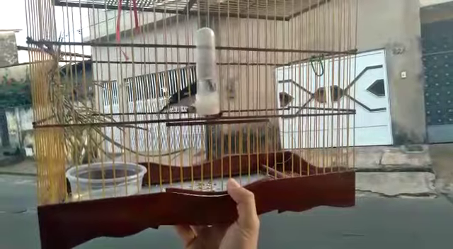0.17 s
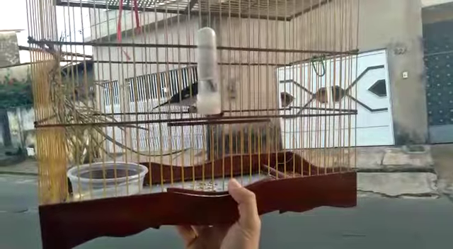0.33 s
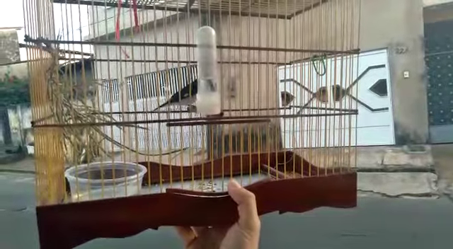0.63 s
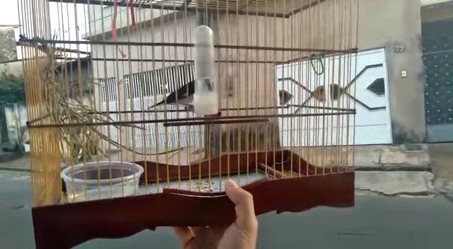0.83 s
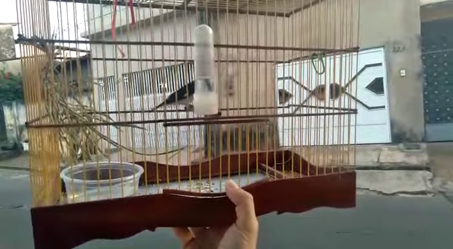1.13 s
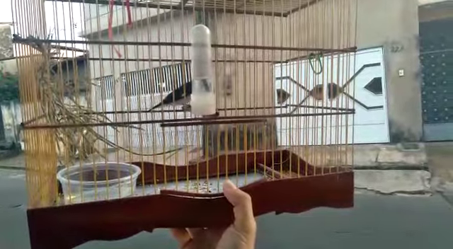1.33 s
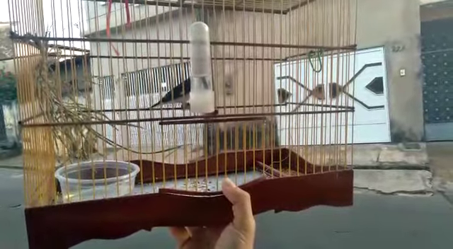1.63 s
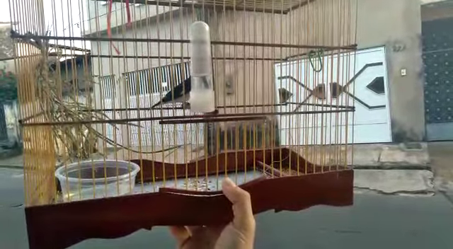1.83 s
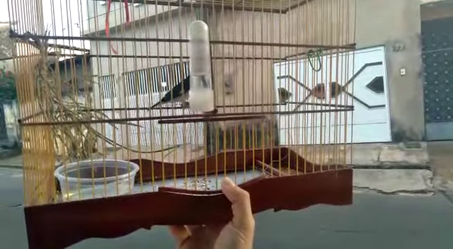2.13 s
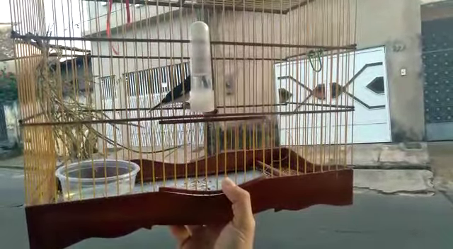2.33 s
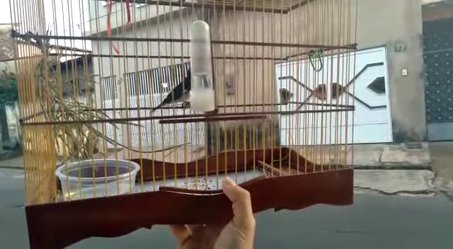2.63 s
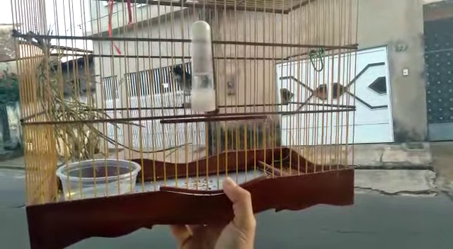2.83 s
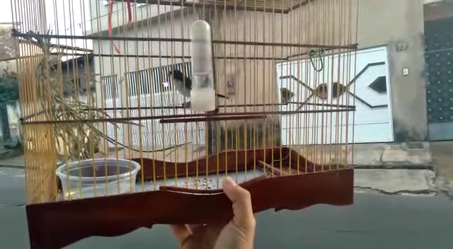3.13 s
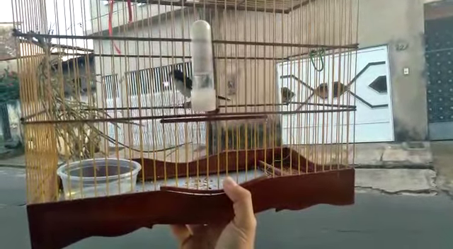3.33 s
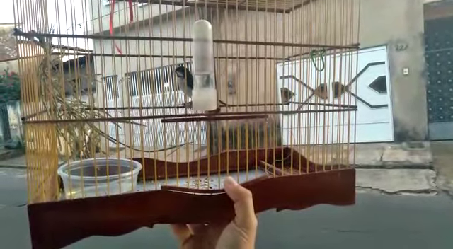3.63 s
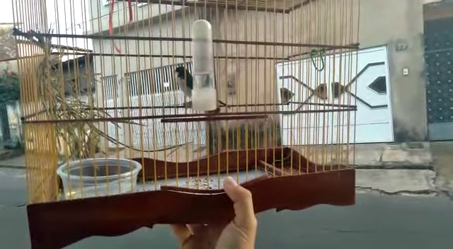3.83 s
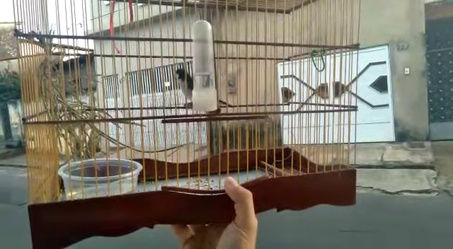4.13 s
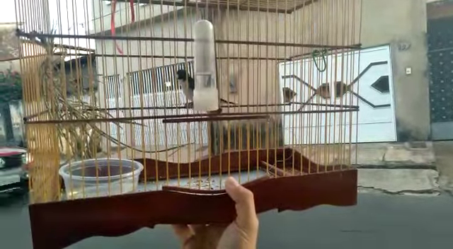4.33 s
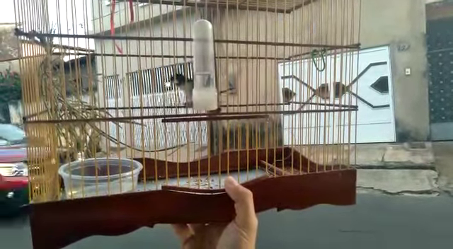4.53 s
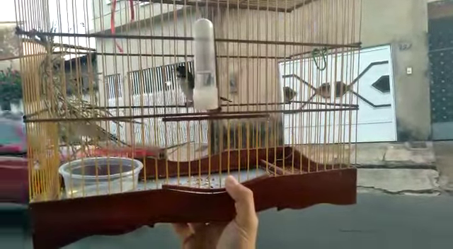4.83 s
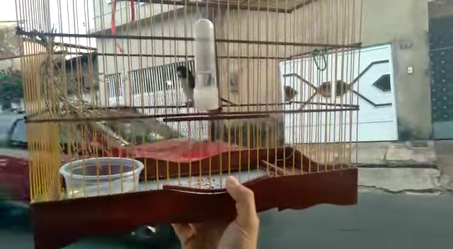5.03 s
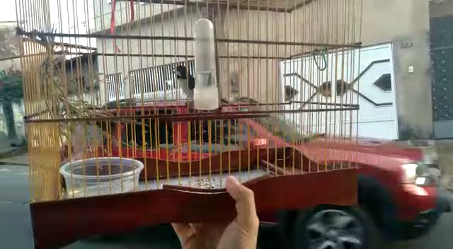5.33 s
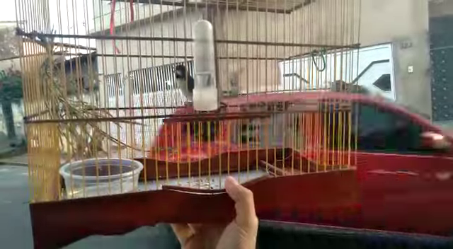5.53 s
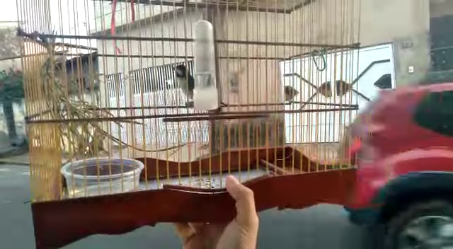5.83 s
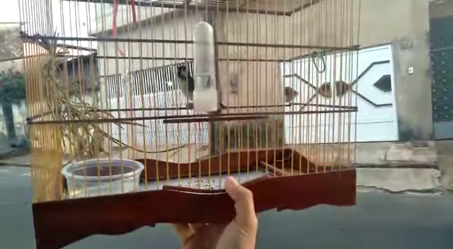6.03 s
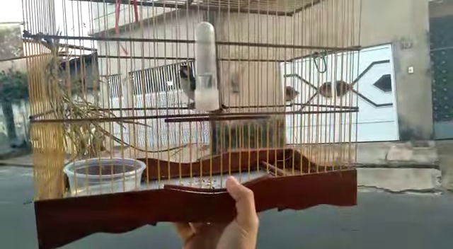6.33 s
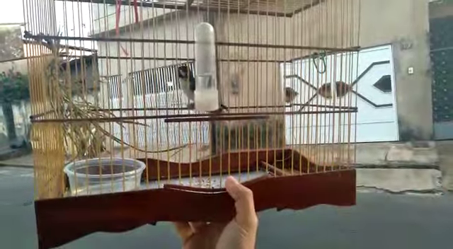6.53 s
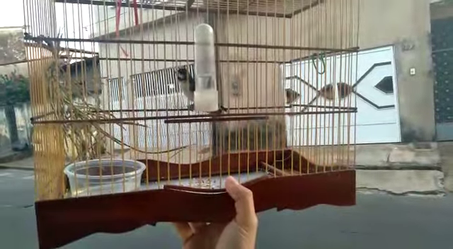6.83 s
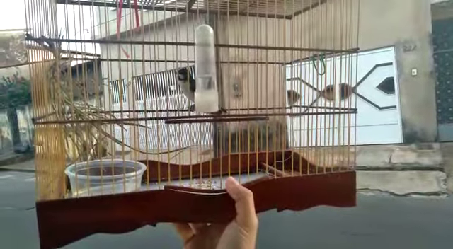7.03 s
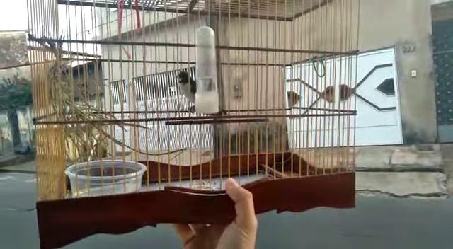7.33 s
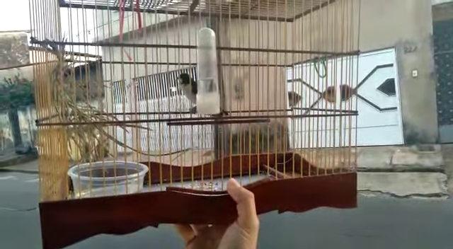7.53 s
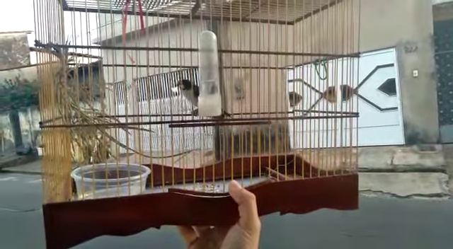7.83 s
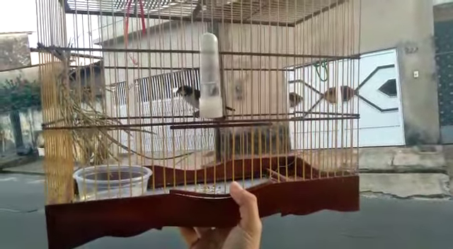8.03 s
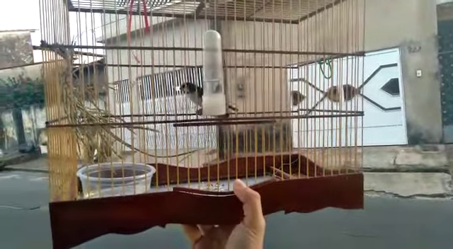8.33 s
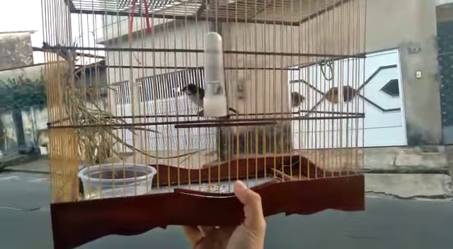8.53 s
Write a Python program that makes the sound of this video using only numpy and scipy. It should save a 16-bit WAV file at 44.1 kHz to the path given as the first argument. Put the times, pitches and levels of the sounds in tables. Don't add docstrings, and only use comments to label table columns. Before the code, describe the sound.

Distant birds call in echo, a car rolls by, then a small bird held close whistles and trills piercingly while its cage knocks.

```python
import sys
import numpy as np
from scipy import signal
from scipy.io import wavfile
from scipy.ndimage import uniform_filter1d, minimum_filter1d

SR = 44100
rng = np.random.default_rng(int(sys.argv[2]) if len(sys.argv) > 2 else 0)


def transcribe(u):
    v = np.clip(np.atleast_2d(u).T, -1, 1)
    q = np.round(v * 32767).astype(np.int16)
    wavfile.write(sys.argv[1], SR, q)


def field_ratio(decibels):
    return 10 ** (np.asarray(decibels, dtype=float) / 20)


N = 382347

# pitch in Hz, level in dB per Hz.
STREET_HUM = [(25, -35.5), (43, -2), (243, -6.5), (435, -13.5), (707, -43), (947, -17), (1510, -24),
              (2600, -66)]
# pitch in Hz, level in dB per Hz.
STREET_HISS = [(2600, -57), (3100, -55), (3710, 12), (4580, -38), (5790, -13), (7890, -5), (15800, -42)]
# pitch in Hz, level in dB per Hz.
TYRE_ROAR = [(25, -22.5), (70, -7.5), (130, -9), (307, -23), (418, -9), (629, -24), (1170, -13.5),
             (2600, -25.5)]
# pitch in Hz, level in dB per Hz.
TYRE_SIZZLE = [(1530, -45), (2600, 3.5), (2910, -12), (3790, -3), (5600, -8), (8100, 2), (10400, -11.5),
               (15800, -13.5)]
# pitch in Hz, level in dB per Hz.
TYRE_WAKE = [(25, -13.5), (82, -1), (420, -9), (1250, -19), (2140, -22.5), (3680, -37.5), (8260, -28.5),
             (10500, -61)]
# time in seconds, level in dB.
CAR_PASS = [(1.0, -46.5), (1.93, -44), (2.54, -38.5), (3.4, -34.5), (4.8, -30.5), (5.14, -34), (5.6, -38.5),
            (6.5, -45), (7.2, -46), (8.2, -57)]
# time in seconds, level in dB.
WAKE_LEVEL = [(2.0, -84), (4.8, -34), (5.87, -32.5), (6.4, -36), (6.85, -35.5), (7.2, -30.5), (7.9, -34),
              (8.33, -33), (8.67, -32.5)]
# time in seconds, firing rate in Hz, level in dB.
CAR_ENGINE = [(2.6, 54.8, -40), (2.77, 55.5, -40), (3.43, 69.53, -33.5), (3.98, 70.5, -31),
              (4.25, 68.43, -30.5), (4.59, 64.14, -31), (4.83, 58.65, -34), (4.96, 58.4, -29.5),
              (5.3, 49.2, -35.5)]
# multiple, level in dB.
ENGINE_MULTIPLES = [(1, 0), (2, -9), (3, -14), (4, -15), (5, -14), (6, -14), (7, -17), (8, -18), (9, -25)]
# time in seconds, pitch in Hz, level in dB.
FAR_ENGINE = [(0.0, 81.8, -50), (0.27, 88, -47), (1.5, 80, -47.5), (2.27, 81, -34), (2.6, 79.7, -42),
              (3.2, 82.5, -47), (5.1, 89, -63), (5.27, 96, -32.5), (6.16, 79.6, -35), (6.96, 75.7, -41),
              (7.38, 89.8, -37), (7.56, 69.8, -29), (7.7, 77.7, -43), (8.3, 66.8, -41.5),
              (8.67, 72.8, -34.5)]
# time in seconds, level in dB.
FAR_CHORUS = [(0.0, -24.5), (0.8, -36.5), (1.46, -32.5), (1.8, -24.5), (2.71, -30.5), (3.0, -40),
              (3.98, -27.5), (4.33, -27), (4.8, -43)]
# start in seconds, length in seconds, from Hz, to Hz, peak in dB.
STEADY_PEEP = [
    (0.0, 0.2, 2290, 2210, -46),
]
# start in seconds, length in seconds, from Hz, to Hz, peak in dB.
FALLING_CALLS = [
    (0.033, 0.0072, 6330, 5200, -60),
    (0.153, 0.046, 9270, 7200, -46.5),
    (.972, 0.19, 6810, 3346, -47),
    (1.141, 0.019, 9230, 7260, -44),
    (1.255, 0.078, 6710, 4460, -48),
    (2.11, 0.032, 8740, 7880, -48),
    (2.81, 0.041, 8840, 8200, -50),
    (7.61, 0.038, 9300, 7110, -47.5),
    (8.272, 0.058, 8700, 8330, -60),
    (8.493, 0.049, 9440, 6900, -46.5),
]
# start in seconds, peak in dB, pitch in Hz, seconds to fade by 60 dB.
WIRE_TICKS = [
    (0.4469, -31, 6100, 0.14),
    (0.4475, -31, 8000, 0.1),
    (2.3361, -31, 7700, 0.03),
    (5.322, -29, 8000, .02),
    (7.5158, -39, 6400, 0.08),
    (8.652, -42, 8000, .04),
]
# start in seconds, peak in dB, pitch in Hz, seconds to fade by 60 dB.
CAGE_KNOCKS = [(2.4256, -10, 1850, 0.029), (2.5044, -16, 1590, 0.04), (7.0893, -19, 802, 0.045),
               (7.165, -18, 1220, 0.024), (7.3949, -8, 1540, 0.024), (7.649, -20, 1020, 0.068),
               (7.728, -33, 715, 0.028), (7.754, -9, 1530, 0.0066), (8.0025, -18, 703, 0.03),
               (8.134, -22, 610, 0.04), (8.3823, -15.5, 1250, 0.034), (8.441, -18.5, 883, 0.12),
               (8.51, -20, 1090, .04), (8.652, -20.5, 1060, 0.04)]
# start in seconds, peak in dB, pitch in Hz, seconds to fade by 60 dB.
CAGE_THUDS = [(2.42, -36, 217, 0.14), (2.498, -29.5, 191, 0.26), (5.616, -17.5, 408, 0.055),
              (6.005, -20, 255.2, 0.22), (7.088, -18.5, 267, 0.034), (7.444, -20.5, 300, 0.043),
              (7.499, -20, 380, 0.02), (7.65, -31, 272, 0.04), (7.752, -49, 299, 0.047),
              (8.0, -30.5, 247, 0.079), (8.437, -25.5, 247, 0.1)]
# time in seconds, pitch in Hz, level in dB.
DISTANT_WHISTLES = [
    [(1.33, 3890, -45), (1.344, 3920, -29), (1.366, 3780, -23), (1.396, 3820, -25.5), (1.412, 3810, -42),
     (1.438, 3780, -26), (1.45, 3786, -65)],
    [(1.512, 4060, -46), (1.518, 3971, -37), (1.544, 3820, -23), (1.592, 3640, -29), (1.61, 3770, -24),
     (1.632, 3690, -38), (1.662, 3720, -32), (1.672, 3720, -44)],
]
# time in seconds, pitch in Hz, level in dB.
DISTANT_CALLS = [
    [(3.097, 3602, -43), (3.103, 3720, -40), (3.127, 3800, -32), (3.159, 4040, -40), (3.175, 4160, -30.5),
     (3.255, 4090, -46)],
    [(3.315, 5200, -42), (3.335, 5000, -29), (3.365, 4600, -38), (3.39, 4350, -36), (3.41, 4000, -22),
     (3.425, 3650, -29), (3.44, 3250, -42)],
]
# start in seconds, length in seconds, from Hz, to Hz, peak in dB.
FAR_CLEAR_NOTES = [
    (0.93, 0.13, 3850, 3935, -39.5),
    (3.165, 0.03, 6230, 6200, -38),
    (3.215, 0.02, 6200, 6200, -42),
    (3.27, .03, 6200, 6200, -39),
    (3.76, .05, 3750, 3800, -36),
    (3.86, .05, 3800, 3700, -36),
    (4.07, .05, 3750, 3700, -37),
    (4.17, .06, 3750, 3650, -36),
]
# start in seconds, length in seconds, from Hz, to Hz, peak in dB.
FAR_THROB = [
    (2.665, 0.219, 3915, 3820, -25.5),
]
# start in seconds, peak in dB, pitch in Hz.
FAR_TRILL_NOTES = [(1.864, -19, 3870), (2.053, -20, 3890), (2.233, -20, 4040), (2.295, -23, 4150),
                   (2.3834, -17, 3820), (2.417, -22, 3840), (2.478, -20.5, 3900), (2.5438, -17.5, 3920),
                   (2.672, -21.5, 3874), (2.852, -26, 3800)]
# main arch in seconds, stretch factor, level in dB.
DISTANT_WARBLES = [
    (1.79, 1.03, -16.5),
    (1.881, 0.96, -17),
    (1.976, 0.84, -16),
    (2.067, 1.03, -18),
    (2.159, 1.03, -24.5),
]
# from Hz, to Hz, level in dB.
CARRYING_BANDS = [(3700, 4000, 3), (3270, 3430, -4), (4100, 4900, -10)]
# time in seconds, pitch in Hz, level in dB.
OPENING_PIP = [(4.968, 4455, -38.5), (4.984, 4287, -18), (4.996, 4314, -13), (5.01, 4320, -17),
               (5.019, 4370, -25)]
# time in seconds, pitch in Hz, level in dB.
NEAR_WHISTLES = [
    [(5.153, 4030, -36.5), (5.173, 3940, -16), (5.193, 3883, -13.5), (5.211, 3843, -13),
     (5.219, 3840, -20.5), (5.229, 3714, -14.5), (5.256, 3760, -18.5)],
    [(5.343, 4080, -29), (5.359, 4008, -10), (5.381, 3962, -6.5), (5.405, 3848, -9.5), (5.423, 3860, -7),
     (5.433, 3820, -19), (5.441, 3660, -9.5), (5.449, 3766, -26)],
    [(5.529, 3977, -24), (5.549, 4025, -7), (5.575, 3954, -5.5), (5.597, 3850, -11.5), (5.609, 3840, -5),
     (5.628, 3795, -32.5)],
    [(5.714, 3900, -25), (5.73, 4047, -6.5), (5.752, 3923, -5.5), (5.782, 3835, -10.5), (5.794, 3790, -10),
     (5.806, 3990, -26)],
]
# multiple, level in dB.
WHISTLE_OVERTONES = [(2, -26), (3, -26), (4, -33)]
# start in seconds, length in seconds, from Hz, to Hz, peak in dB.
WHISTLE_FLICKS = [
    (5.15, 0.0085, 3270, 4000, -29),
    (5.342, 0.012, 2800, 3820, -31),
    (5.528, 0.008, 2900, 3906, -24),
    (5.628, 0.01, 4000, 3480, -10),
    (5.714, 0.009, 2835, 3800, -29.5),
    (5.816, 0.007, 4360, 3050, -18),
]
# time in ms, crest in Hz, flank in dB, dip at crest in dB, dip after it in dB.
BUZZ_ARCHES = [(1, 3550, -20, 0, 0), (5, 3400, -7, -1, -3), (13.5, 3350, -9, -1, -14),
               (22.5, 3800, -12, -9, -1), (33.5, 3900, -5, -9, -10), (40.5, 3800, -5, -8, 1),
               (46.5, 3800, -6, -10, -1), (53, 3950, -10, -9, -9), (60.5, 3200, -11, 0, 0),
               (66, 2200, -28, 0, 0)]
BUZZ_LOWS = [3000, 2600, 3000, 2900, 3350, 3100, 2700]
# time in ms, crest in Hz, flank in dB, dip at crest in dB, dip after it in dB.
WARBLE_ARCHES = [(-14, 4500, -20, 0, 0), (-13, 4800, -13, -1, -12), (-10.6, 4500, -8, -1, -9),
                 (-8.5, 3900, -19, 0, 0), (-6.5, 4100, -26, 0, 0), (-4.6, 4150, -2, 0, 0),
                 (-2, 4450, -1, 0, 0), (0, 4720, 0, -6, -1), (6.3, 4600, 0, -17, -1),
                 (12.3, 4600, 0, -3, -15), (18.5, 4500, -2, -6, -11), (28, 3800, -4, -17, -13),
                 (36, 3150, -4, 0, 0), (39, 2900, -24, 0, 0), (41, 2300, -30, 0, 0), (44, 3350, -16, 0, 0)]
WARBLE_LOWS = [4300, 3600, 3980, 4050, 3800, 2800, 2700]
# time in ms, crest in Hz, flank in dB, dip at crest and after in dB.
TIRED_ARCHES = [(-15, 4100, -22, 0, 0), (-13, 4500, -12, -1, -12), (-10, 4400, -7, -2, -8),
                (-7, 4200, -15, -1, -8), (0, 4750, -3, -12, -15), (7.5, 4250, -5, -8, -4),
                (13, 4450, -1, -4, -8), (21, 3300, -3, -1, -21), (29, 3650, -14, 0, 0),
                (32, 3050, -10, 0, 0), (34, 2600, -25, 0, 0), (43, 2300, -23, 0, 0)]
TIRED_LOWS = [3900, 3300, 3900, 3600, 3600, 3050, 2800]
# time in ms, pitch in Hz, peak in dB.
SQUEAK_PITCH = [(-11, 7200, -50), (-9, 6300, -21), (-7.5, 5400, -34), (-5.5, 5900, -23), (-3.5, 5000, -50),
                (3, 5000, -50), (5.5, 5900, -21), (8, 6900, -50), (21, 6300, -55), (23.5, 5800, -31),
                (26, 6200, -55)]
# main arch in seconds, stretch factor, level in dB, tail in dB.
TRILL_NOTES = [
    (5.998, 1.01, -1, -2),
    (6.091, 0.97, -1, -1),
    (6.181, 1.02, -0.5, -0.8),
    (6.270, 1.01, -0.3, -2),
    (6.362, 1.02, -1, -1.5),
    (6.4533, 1.06, -2, -1),
]
# main arch in seconds, stretch factor, level in dB, tail in dB.
TIRED_NOTES = [
    (6.547, 1.09, 0.2, -1.5),
    (6.644, 0.97, 2.2, -2),
    (6.735, 1.05, 0, -4.5),
    (6.842, 0.9, -3, -0.5),
]
# multiple, level in dB, lag in ms, loss at the ends in dB.
WARBLE_OVERTONES = [(2, -15, .4, 0), (3, -17, -.4, -8), (4, -44.5, 0, -3)]
# delay in seconds, level in dB.
WALL_ECHOES = [
    (0.047, -44.5),
    (0.062, -28.5),
]
# pitch in Hz, level in dB per narrow band.
GATE_THRESHOLD = [(300, -71), (700, -66), (3000, -72.5), (6000, -71), (10000, -70), (12500, -80.5),
                  (16000, -82)]


def in_time(rows):
    seconds, *columns = np.transpose(rows)
    return [np.interp(np.arange(N) / SR, seconds, column) for column in columns]


def drift(rate_hz, every=1):
    pole = np.exp(-32 * np.pi * rate_hz / SR)
    noise = rng.standard_normal(N // 16 + 5002)
    slow = signal.lfilter([1], [1, -2 * pole, pole * pole], noise)[5000:]
    return np.interp(np.arange(0, N, every) / 16, np.arange(len(slow)), slow / slow.std())


def band_pass(x, low_hz, high_hz, order=2):
    return signal.sosfilt(signal.butter(order, [low_hz, high_hz], "band", fs=SR, output="sos"), x)


def add(out, s, sound):
    i = max(round(s * SR), 0)
    out[i:i + len(sound)] += sound[:N - i]


def tone(hz, height, overtones=()):
    phase = 2 * np.pi * np.cumsum(hz) / SR
    wave = np.sin(phase)
    for k, db in overtones:
        wave = wave + field_ratio(db) * np.sin(k * phase) * (k * hz < 0.45 * SR)
    return height * wave


def glides(events, rough_hz):
    out, wobble = np.zeros(N), drift(190)
    for s, length, from_hz, to_hz, db in events:
        u = np.linspace(0, 1, round(length * SR))
        hz = from_hz + (to_hz - from_hz) * u ** 0.81
        hz = hz + rough_hz * wobble[round(s * SR):][:len(u)]
        add(out, s, tone(hz, field_ratio(db) * np.sin(np.pi * u ** 0.66) ** 0.48))
    return out


def whistles(notes, fade_s, overtones):
    out = np.zeros(N)
    for rows in notes:
        s, hz, db = np.transpose(rows)
        t = np.arange(s[0], s[-1], 1 / SR)
        hz, db = [uniform_filter1d(np.interp(t, s, c), size=180, mode="nearest") for c in (hz, db)]
        edge = np.clip(np.minimum(t - s[0], s[-1] - t) / fade_s, 0, 1)
        effort = [(k, level + 0.5 * (db + 14)) for k, level in overtones]
        add(out, s[0], tone(hz, np.sqrt(2) * edge * field_ratio(db), effort))
    return out


def arches(rows, lows):
    edge_ms, edge_db, swing_hz = 4, -26, 570
    first_ms, first_hz, first_db = rows[0][:3]
    last_ms, last_hz, last_db = rows[-1][:3]
    points = [(first_ms - edge_ms, first_hz - swing_hz, first_db + edge_db),
              (first_ms - edge_ms / 2, first_hz - swing_hz / 2, first_db),
              (last_ms, last_hz, last_db),
              (last_ms + edge_ms, last_hz - swing_hz, last_db + edge_db)]
    lows = iter(lows)
    for (ms, hz, db, crest_db, dip_db), (next_ms, next_hz, next_db, *_) in zip(rows, rows[1:]):
        points.append((ms, hz, db + crest_db))
        if crest_db or dip_db:
            low, gap = next(lows), next_ms - ms
            points.append((ms + gap / 4, hz - 0.55 * (hz - low), db))
            points.append((ms + gap / 2, low, min(db, next_db) + dip_db))
            points.append((next_ms - gap / 4, next_hz - 0.55 * (next_hz - low), next_db))
    return points


def eased(points, stretch):
    ms, hz, db = np.transpose(sorted(points))
    order = np.arange(len(ms))
    now = np.arange(ms[0], ms[-1], 1000 / SR / stretch)
    place = np.interp(now, ms, order)
    place = np.floor(place) + 0.5 - 0.5 * np.cos(np.pi * (place % 1))
    return ms[0] * stretch / 1000, now, np.interp(place, order, hz), np.interp(place, order, db)


def street_echo(x, t60, delay_s):
    t = np.arange(0, 1.2, 1 / SR)
    tail = rng.standard_normal(len(t)) * field_ratio(-60 * t / t60)
    tail = tail * np.clip((t - delay_s) / 0.01, 0, 1)
    return signal.fftconvolve(x, tail / np.sqrt(np.sum(tail ** 2)))[:N]


def noise_share(curve, hz, width_hz):
    curve_hz, curve_db = np.transpose(curve)
    db = np.interp(np.log(hz), np.log(curve_hz), curve_db, left=-99, right=-99)
    power = field_ratio(2 * db) * width_hz
    return (power / power.sum())[:, None]


def traffic():
    step = 64
    near_db, wake_db = [c[::step] for c in in_time(CAR_PASS) + in_time(WAKE_LEVEL)]
    hiss_db = -56 - 39 * np.maximum(np.arange(0, N, step) / SR - 7.4, 0)
    sizzle_db = near_db.max() + 1.5 + 0.91 * (near_db - near_db.max())
    edges = 25 * 2 ** (np.arange(29) / 3)
    hz = np.sqrt(edges[1:] * edges[:-1])
    power = 0
    for curve, db in [(STREET_HUM, -42), (STREET_HISS, hiss_db), (TYRE_ROAR, near_db),
                      (TYRE_SIZZLE, sizzle_db), (TYRE_WAKE, wake_db)]:
        power = power + noise_share(curve, hz, np.diff(edges)) * field_ratio(2 * db)
    height = np.sqrt(power)
    out, white, gust = np.zeros(N), rng.standard_normal((2, N)), drift(1.9, every=step)
    for k in range(len(hz)):
        band = band_pass(white[k % 2], edges[k], edges[k + 1])
        level = height[k] * field_ratio(0.72 * gust + 1.16 * drift(9.4, every=step))
        out += band / band.std() * np.interp(np.arange(N) / step, np.arange(len(gust)), level)
    return out


def chorus():
    wash = band_pass(rng.standard_normal(N), 3550, 4150, order=3)
    level_db = in_time(FAR_CHORUS + [(5.6, -93.5)])[0]
    return wash / wash.std() * field_ratio(level_db - 10.5 + 1.6 * drift(20))


def engines():
    silent_start, silent_end = (2.3, CAR_ENGINE[0][1], -72), (5.6, 45.9, -73)
    hz, db = in_time([silent_start] + CAR_ENGINE + [silent_end])
    car = tone(hz, np.sqrt(2) * field_ratio(db + drift(2.3)), ENGINE_MULTIPLES[1:])
    hz, db = in_time(FAR_ENGINE)
    return car + tone(hz + 2.58 * drift(3.95), field_ratio(db + 2.5 * drift(6.4)))


def knocks(events, crack_db, width):
    out, t = np.zeros(N), np.arange(0, 0.12, 1 / SR)
    for s, db, hz, t60 in events:
        crack = band_pass(rng.standard_normal(len(t)), hz / width, min(hz * width, 0.45 * SR))
        crack = field_ratio(crack_db - 60 * t / t60) * crack / crack.std()
        ring = np.sin(2 * np.pi * hz * t) * field_ratio(-60 * t / (7 / hz + 0.003))
        add(out, s, field_ratio(db) * np.minimum(t / 0.0012, 1) * (ring + crack))
    return out


def cage():
    ticks = knocks(WIRE_TICKS, crack_db=0, width=1.2)
    bars = knocks(CAGE_KNOCKS, crack_db=-11, width=1.5)
    return ticks + bars + knocks(CAGE_THUDS, crack_db=-0.5, width=1.94)


def far_warbles():
    out, wobble = np.zeros(N), drift(264)
    notes = [(BUZZ_ARCHES, BUZZ_LOWS, 1.672, 0.97, -22)]
    notes += [(WARBLE_ARCHES, WARBLE_LOWS, *note) for note in DISTANT_WARBLES]
    for rows, lows, s, stretch, level_db in notes:
        start, ms, hz, db = eased(arches(rows, lows), stretch)
        hz = 4200 + 0.75 * (hz - 4250) + 40 * wobble[round(s * SR):][:len(hz)]
        add(out, s + start, tone(hz, field_ratio(db + level_db)))
    return sum(field_ratio(db) * band_pass(out, low, high) for low, high, db in CARRYING_BANDS)


def far_trill():
    out, t = np.zeros(N), np.arange(0, 0.035, 1 / SR)
    for s, db, hz in FAR_TRILL_NOTES:
        turn = rng.random()
        pitch = hz * (1.04 - 2.5 * t + 0.05 * np.sin(2 * np.pi * (95 * t + turn)))
        throb = 0.66 + 0.27 * np.sin(2 * np.pi * (190 * t + turn))
        swell = np.sin(np.pi * (t / t[-1]) ** 0.27)
        add(out, s - 0.002, tone(pitch, field_ratio(db - 3) * throb * swell))
    return out


def far_birds():
    throb = 0.49 + 0.62 * np.sin(2 * np.pi * 47 * np.arange(N) / SR)
    song = far_warbles() + far_trill() + glides(FAR_CLEAR_NOTES, rough_hz=30.8)
    song += glides(FAR_THROB, rough_hz=91) * throb
    falling = glides(FALLING_CALLS, rough_hz=155)
    song += field_ratio(-7) * falling
    song = song + street_echo(field_ratio(1) * song + field_ratio(17) * falling, t60=0.89, delay_s=0.0021)
    clear = whistles(DISTANT_WHISTLES + DISTANT_CALLS, fade_s=0.004, overtones=[(2, -32), (4, -30)])
    return song + clear + field_ratio(-9.5) * street_echo(clear, t60=0.7, delay_s=0.02)


def buzz():
    start, ms, hz, db = eased(arches(BUZZ_ARCHES, BUZZ_LOWS), stretch=0.94)
    air = signal.sosfilt(signal.butter(2, 4800, "high", fs=SR, output="sos"), rng.standard_normal(N))
    voice = tone(hz + 60 * drift(256)[:len(hz)], field_ratio(db), [(2, -25), (5, -47)])
    out = np.zeros(N)
    add(out, 5.88 + start, voice + field_ratio(db - 24) * air[:len(hz)])
    return out


def trill():
    out, wobble, flutter = np.zeros(N), drift(256), drift(350)
    air = signal.sosfilt(signal.butter(2, 4800, "high", fs=SR, output="sos"), rng.standard_normal(N))
    notes = [(WARBLE_ARCHES, WARBLE_LOWS, *note) for note in TRILL_NOTES]
    notes += [(TIRED_ARCHES, TIRED_LOWS, *note) for note in TIRED_NOTES]
    for rows, lows, s, stretch, level_db, tail_db in notes:
        start, ms, hz, db = eased(arches(rows, lows), stretch)
        first = round((s + start) * SR)
        here = slice(first, first + len(ms))
        hz = hz + 70 * wobble[here]
        db = db + level_db + tail_db * np.clip((ms - 20) / 8, 0, 1) + 1.86 * flutter[here]
        full = -minimum_filter1d(-db, size=130) - db
        ends = np.clip(np.abs(ms - 4) / 3 - 3, 0, 1)
        shared_db = 0.7 * full + 2.5 * flutter[here][::-1]
        effort = []
        for k, level, lag_ms, loss_db in WARBLE_OVERTONES:
            height_db = (np.interp(ms - lag_ms, ms, hz) - 4500) / 55
            effort.append((k, level + shared_db + loss_db * ends + height_db))
        breath = field_ratio(db - 23 + (hz - 4500) / 200) * air[here]
        add(out, s + start, tone(hz, field_ratio(db), effort) + breath)
        start, ms, hz, db = eased(SQUEAK_PITCH, stretch)
        add(out, s + start, tone(hz + 150 * wobble[here][:len(hz)], field_ratio(db + level_db + 7.5)))
    return out


def near_bird():
    notes = whistles(NEAR_WHISTLES + [OPENING_PIP], fade_s=0.003, overtones=WHISTLE_OVERTONES)
    warbles = buzz() + trill()
    bird = notes + glides(WHISTLE_FLICKS, rough_hz=40) + warbles
    to_walls = band_pass(notes + field_ratio(-4.5) * warbles, 3450, 4200)
    near = bird + field_ratio(-14) * street_echo(to_walls, t60=0.96, delay_s=0.012)
    for s, db in WALL_ECHOES:
        add(near, s, field_ratio(db) * bird)
    return near + field_ratio(-22) * street_echo(bird, t60=0.1, delay_s=0.0075)


def scene():
    street = traffic() + chorus() + engines() + glides(STEADY_PEEP, rough_hz=6.7)
    return (street + far_birds() + cage() + near_bird())[None]


def noise_gate(x, depth_db, soft_db):
    hz, _, cells = signal.stft(x, SR, nperseg=1024)
    level = uniform_filter1d(uniform_filter1d(np.abs(cells) ** 2, size=5, axis=0), size=7, axis=1)
    above = 10 * np.log10(level + 1e-14) - np.interp(hz, *np.transpose(GATE_THRESHOLD))[:, None]
    wander = rng.standard_normal(above.shape)
    wander = uniform_filter1d(uniform_filter1d(wander, size=4, axis=0), size=16, axis=1)
    above += 4.06 * wander / wander.std()
    shut = 0.5 - 0.5 * np.tanh(above / soft_db)
    return signal.istft(cells * field_ratio(depth_db * shut), SR, nperseg=1024)[1][:N]


def limiter(x):
    over = np.maximum(20 * np.log10(np.abs(x) + 1e-9) + 2.2, 0)
    slope = 400 * np.arange(N) / SR
    held = np.maximum.accumulate(over + slope) - slope
    return x * field_ratio(uniform_filter1d(minimum_filter1d(-held, size=45), size=44))


def low_pass(x):
    return signal.sosfilt(signal.butter(12, 15940, fs=SR, output="sos"), x)


def record(dry):
    limited = limiter(noise_gate(dry[0], depth_db=-21, soft_db=1.5))
    treble_cut = signal.cheby2(18, 70, 16150, fs=SR, output="sos")
    return low_pass(signal.sosfilt(treble_cut, limited)[None])


dry = scene()
out = record(dry)
transcribe(out)
```